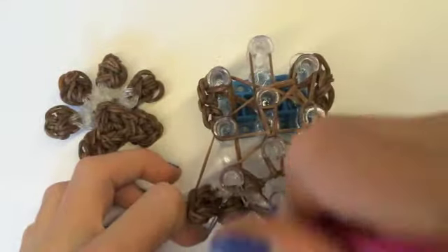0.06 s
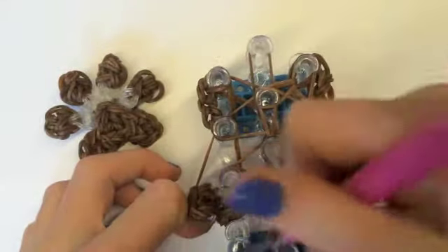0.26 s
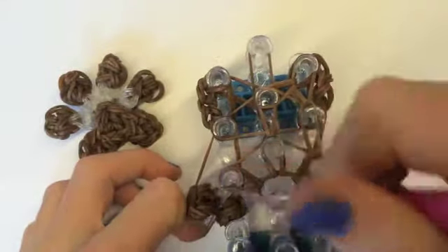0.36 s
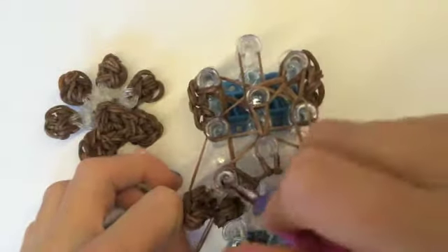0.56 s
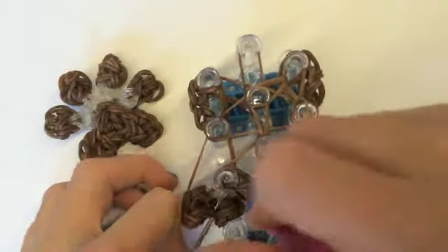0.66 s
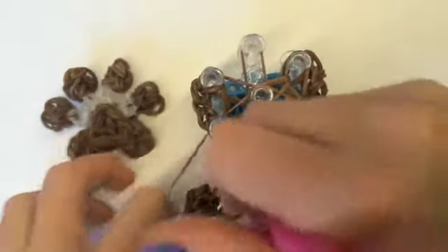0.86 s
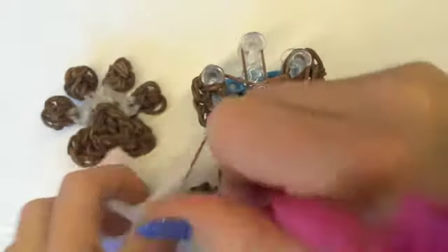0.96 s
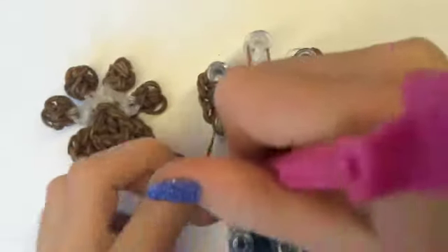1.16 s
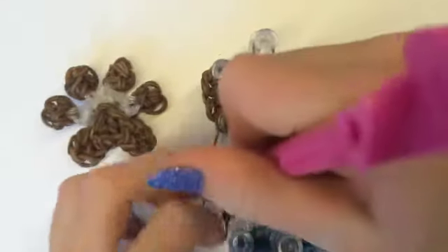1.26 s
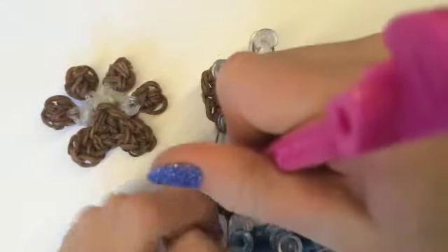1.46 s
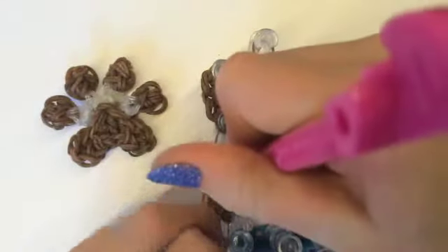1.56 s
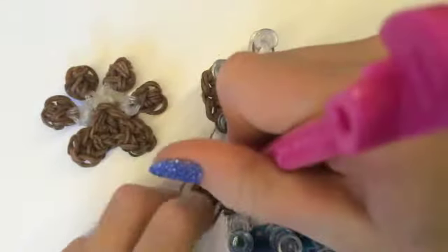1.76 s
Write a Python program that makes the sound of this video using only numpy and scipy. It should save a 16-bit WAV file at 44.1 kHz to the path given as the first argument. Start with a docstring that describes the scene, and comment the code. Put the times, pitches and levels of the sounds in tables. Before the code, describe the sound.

A plastic hook clicks against loom pegs, close up in a small room. After a faint rub, a loud bright double snap rings at 0.23 s, with a weaker crack at 0.28. Softer clicks and knocks come near 0.55, then light taps and rubs from 0.8 to 1.0. A band squeaks faintly with a dull knock at 1.24; small ticks and low bumps cluster around 1.65-1.8. Low noise and faint wavering hum continue.

```python
"""A plastic crochet hook works rubber bands over the pegs of a small plastic loom on a table.
Early on the hook snaps off a peg with bright cracks and rings, and the loom knocks on the table.
Light ticks, softer knocks, low bumps and hissing rubs of fingers and bands follow, made from noise and tones.
Past the middle one band drags with a short squeak of unsteady tones, then the handling goes on.
Throughout there is the short echo of a small room, with low noise and a faint wavering hum."""
import sys
import numpy as np
from scipy import signal
from scipy.fft import rfft, irfft, next_fast_len
from scipy.io import wavfile

SR = 44100
rng = np.random.default_rng(int(sys.argv[2]) if len(sys.argv) > 2 else 0)


def bounce(signal):
    """Save signal as a 16-bit WAV file at the path given by the first command-line argument."""
    frames = np.transpose(np.atleast_2d(signal))
    limited = np.clip(frames, -1, 1)
    pcm = np.round(limited * 32767).astype(np.int16)
    wavfile.write(sys.argv[1], SR, pcm)


N = 81585  # length in samples

TILT_PIVOT_HZ = 3920  # a treble tilt leaves this pitch unchanged


def amp(db):
    """Turns decibels into a gain."""
    return 10 ** (np.asarray(db) / 20)


def evened(x):
    """Scales a sound to an average (rms) strength of 1."""
    return x / np.sqrt(np.mean(x ** 2) + 1e-20)


def read(points, hz):
    """Reads values between the points of a table, along a log-frequency axis."""
    point_hz, value = np.transpose(points)
    return np.interp(np.log(hz + 1), np.log(point_hz + 1), value)


def add(mix, start_s, sound):
    """Mixes a sound in at a given time, cutting off what runs past the end."""
    part = mix[max(round(start_s * SR), 0):][:len(sound)]
    part += sound[:len(part)]


def octaves(hz, centre_hz):
    """Gives the distance in octaves from a centre; the added 20 Hz keeps the log finite."""
    return np.log2((hz + 20) / centre_hz)


def colour(x, curve):
    """Filters a sound by curve(Hz) in dB, with no response ahead of the sound itself."""
    size = next_fast_len(2 * len(x))
    hz = abs(np.fft.fftfreq(size, 1 / SR))
    log_gain = np.log(amp(curve(hz)))
    # The Hilbert transform finds the phase that makes the filter respond as early as it can
    response = np.exp(np.conj(signal.hilbert(log_gain)))
    return np.fft.ifft(np.fft.fft(x, size) * response).real[:len(x)]


def noise(spectrum, size):
    """Makes noise of rms 1 whose strength at each pitch follows a table."""
    gain = amp(read(spectrum, np.fft.rfftfreq(size, 1 / SR)))
    return evened(irfft(rfft(rng.standard_normal(size)) * gain, size))


def ring(modes, t):
    """A struck body rings as a sum of fading tones; each drops 60 dB in its own t60."""
    total = np.zeros(len(t))
    for hz, db, t60 in modes:
        fade = np.exp(-np.log(1000) * t / t60)
        total += amp(db) * fade * np.sin(2 * np.pi * hz * t)
    return total


def snap(db, tilt_db, first_hz, first_db, second_hz, second_db):
    """The hook springs free and strikes a peg, which rings fully."""
    return click(db, tilt_db, [(first_hz, first_db), (second_hz, second_db)], ring_db=0, decay_s=0.0024)


def tick(db, tilt_db, favoured_hz, lift_db):
    """A light, brief touch, its ring muted by fingers and bands."""
    return click(db, tilt_db, [(favoured_hz, lift_db)], ring_db=-2.5, decay_s=0.002)


def click(db, tilt_db, lifts, ring_db, decay_s):
    """Plastic meets plastic: a crack and a short ring, coloured by the place of contact."""
    # Ring of hook and pegs: pitch_hz, level_db, t60_s
    peg_modes = [(1113, -27.5, 0.031), (1427, -35.5, .06), (1650, -30.5, 0.024), (2491, -28.5, 0.028),
                 (2601, -17, 0.019), (3165, -23, 0.022), (3540, -28, .04), (4740, -30.5, .028),
                 (5590, -24, 0.016), (5880, -23, 0.014), (8510, -26.5, 0.006), (9525, -25.5, 0.015),
                 (11790, -29, 0.024), (12580, -24.5, 0.0075), (15400, -27, 0.006)]
    # Dense crack of the contact: pitch_hz, level_db (per Hz)
    crack_spectrum = [(60, -16), (300, -8.5), (700, -9.5), (1200, -2), (1900, -2.5), (3000, -1.5),
                      (4200, -4), (5500, -1), (7400, -1), (9500, -1.5), (13500, -1.5), (15000, -0.5)]
    crack_db, contact_s, lift_octaves = -8.5, 0.0004, 0.29
    t = np.arange(SR // 16) / SR

    def contact(hz):
        """Tilts the treble and lifts (or dips, if negative) the pitches near each centre."""
        total = tilt_db * octaves(hz, TILT_PIVOT_HZ)
        for centre_hz, lift_db in lifts:
            total = total + lift_db * np.exp(-(octaves(hz, centre_hz) / lift_octaves) ** 2)
        return total

    crack = amp(crack_db) * noise(crack_spectrum, len(t)) * np.exp(-t / decay_s)
    body = amp(ring_db) * ring(peg_modes, t)
    onset = np.minimum(t / contact_s, 1)
    return amp(db) * colour((crack + body) * onset, contact)


def knock(db, centre_hz, spread_octaves):
    """A soft blow thuds and rings those modes of loom and table that lie near its register."""
    # Ring of loom and table: pitch_hz, level_db, t60_s
    table_modes = [(111, -10.5, 0.18), (226, -8, .12), (268, -1.5, 0.15), (296.7, -5.5, .13),
                   (377.5, -5.5, 0.12), (490, -2, 0.095), (570, -7.5, 0.091), (806, -13.5, .05),
                   (1000, -9, 0.054), (1193, -11.5, .025), (1391, -7.5, 0.026)]
    thud_spectrum = [(150, -1), (1400, -0.5), (2000, -9.5), (15000, -26)]  # pitch_hz, level_db
    thud_decay_s, ring_rise_s, skirt_db = 0.003, 0.0023, 11
    t = np.arange(SR // 4) / SR

    def reach(hz):
        """Weakens pitches the farther they lie from the centre of the blow."""
        return skirt_db * (1 - np.sqrt(1 + (octaves(hz, centre_hz) / spread_octaves) ** 2))

    thud = colour(noise(thud_spectrum, len(t)) * np.exp(-t / thud_decay_s), reach)
    reached_modes = [(hz, level_db + reach(hz), t60) for hz, level_db, t60 in table_modes]
    body = ring(reached_modes, t) * np.minimum(t / ring_rise_s, 1)
    return amp(db) * (thud + body)


def bump(db, hz, rise_s, decay_s):
    """A hand nudges the table: one low, soft swell of tone."""
    t = np.arange(SR // 2) / SR
    swell = np.minimum(t / rise_s, 1) * np.exp(-np.maximum(t - rise_s, 0) / decay_s)
    return amp(db) * swell * np.sin(2 * np.pi * hz * t)


def rub(peak_s, rise_s, fall_s, db, tilt_db):
    """Skin or a band slides on plastic: fine friction grains and hiss that swell and fade."""
    # Colour of the rubbing: pitch_hz, level_db (per Hz)
    rub_spectrum = [(100, -7.5), (400, 6.5), (650, -3), (1000, 4), (1900, -0.5), (2800, 5), (4300, -2.5),
                    (5800, 4.5), (7000, -1.5), (8500, 1.5), (11000, -4), (15000, -0.5)]
    grains_per_s, grain_share = 4700, 0.5
    t = np.arange(N) / SR - peak_s
    grains = evened(rng.standard_normal(N) * (rng.random(N) < grains_per_s / SR))
    friction = grain_share * grains + (1 - grain_share) * rng.standard_normal(N)
    hz = np.fft.rfftfreq(N, 1 / SR)
    gain = amp(read(rub_spectrum, hz) + tilt_db * octaves(hz, TILT_PIVOT_HZ))
    hiss = evened(irfft(rfft(friction) * gain, N))
    swell = np.exp(-(t / np.where(t < 0, rise_s, fall_s)) ** 2)
    return amp(db) * hiss * swell


def squeak():
    """A rubber band drags in a few slips; its unsteady tones sag as it lets go."""
    # Slips of the dragged band: peak_s, length_s (spread of the bell-shaped swell), level_db
    slips = [(1.224, 0.0078, -54.5), (1.2402, 0.0045, -54), (1.242, 0.0033, -45.5), (1.267, 0.0067, -54.5)]
    # Tones of the squeak: pitch_hz (before sag and wander), level_db
    tones = [(900, -1), (1030, -6.5), (1670, -1), (2450, -10.5)]
    wander_share, wander_hz, sag_per_s = 0.047, 221, 0.92  # rms share of the pitch, low-pass edge, sag rate
    t = np.arange(N) / SR
    force = sum(amp(db) * np.exp(-((t - peak_s) / length_s) ** 2 / 2) for peak_s, length_s, db in slips)
    # The pitch slides down through its table value at the second slip
    sag = np.exp(-sag_per_s * np.clip(t - slips[1][0], -0.1, 0.1))
    smoother = signal.butter(2, wander_hz, fs=SR, output="sos")
    out = np.zeros(N)
    for hz, db in tones:
        wander = evened(signal.sosfilt(smoother, rng.standard_normal(N)))
        pitch_hz = hz * sag * (1 + wander_share * wander)
        out += amp(db) * np.sin(2 * np.pi * np.cumsum(pitch_hz) / SR)
    return force * out


def room(x):
    """A small room answers with a diffuse tail of noise that fades at its own rate at each pitch."""
    # Echo of the room: pitch_hz, level_db, t60_s
    echo = np.array([(100, -9, 0.36), (295, -5.5, 0.49), (520, -8, 0.12), (1110, -5, 0.17),
                     (2734, -18, 0.13), (5970, -20, 0.3), (10000, -20, 0.17), (14820, -23, .11)])
    delay_s = 0.0054
    hz, t, cells = signal.stft(rng.standard_normal(SR // 2), SR, nperseg=256)
    rate = np.log(1000) / read(echo[:, [0, 2]], hz)[:, None]
    # The square root keeps the echo's energy independent of how long it lasts
    gain = amp(read(echo[:, [0, 1]], hz))[:, None] * np.sqrt(2 * rate / SR)
    tail = signal.istft(cells * gain * np.exp(-rate * t), SR, nperseg=256)[1]
    out = np.zeros(N)
    add(out, delay_s, signal.fftconvolve(x, tail))
    return out


def background():
    """Low room noise with faint hiss, and a hum whose strength wavers with slow noise."""
    # Colour of the room noise: pitch_hz, level_db (per Hz)
    floor_spectrum = [(21, -40), (35, -11), (134, -6.5), (169, -4.5), (334, -18.5), (541, -18), (833, -25),
                      (922, -24), (1830, -28.5), (2300, -29), (15000, -35.5)]
    floor_db, hum_hz, hum_db = -70, 136.3, -81.5  # hum_db is its level before the wavering
    drift = noise([(1, 0), (6, 0), (20, -40), (100, -100)], N)  # pitch_hz, level_db
    tone = np.sqrt(2) * np.sin(2 * np.pi * hum_hz * np.arange(N) / SR)
    hum = tone * (1 + drift)
    return amp(floor_db) * noise(floor_spectrum, N) + amp(hum_db) * hum


def scene():
    """Puts all the handling sounds in the room, over its background."""
    # Hook snapping against pegs: start_s, level_db, tilt_db (per octave),
    # first_pitch_hz, first_lift_db, second_pitch_hz, second_lift_db
    snaps = [(0.2279, -4, .5, 5856, 8, 2870, 4.5), (0.2335, -3, -1.14, 10020, 3.5, 6660, -6.5),
             (0.2489, -26.5, 3.5, 6000, 7, 3000, -3.5), (0.2802, -15.5, -2.2, 4750, 7.5, 9100, 8.5),
             (0.2856, -32, -7.5, 4900, 18.5, 2627, -1)]
    # Light ticks of hook and bands: start_s, level_db, tilt_db (per octave), favoured_pitch_hz, lift_db
    ticks = [(0.204, -53, 1, 5610, 6), (0.353, -46, -7, 1250, 9), (0.5495, -37, -5, 3300, 11.5),
             (0.5697, -33.5, -3.5, 7000, 4), (0.7899, -46, 1.5, 12980, 7.5), (0.8802, -48, 4, 8700, 10.5),
             (0.9557, -45, 1.5, 2000, 15), (0.9601, -46.5, 3, 13000, -10), (1.003, -55, 12, 12860, -3),
             (1.0225, -55.5, 9.5, 13000, -2), (1.1353, -58.5, 3, 9000, 0), (1.1723, -47, 1.5, 6000, 3),
             (1.3156, -52, -6, 2870, 11.5), (1.4737, -55.5, -1, 2963, 6.5), (1.5101, -56, 3, 2604, 14),
             (1.5552, -53, -4.5, 1301, 2), (1.652, -54.5, -1, 2645, 17.5), (1.67, -46.5, -2.5, 3300, 4),
             (1.7431, -49, -6, 1810, 14.5), (1.7596, -43.5, 0.5, 1750, 6), (1.778, -47, -1.5, 2600, 7)]
    # Loom knocking on the table: start_s, level_db, centre_hz, spread_octaves
    knocks = [(0.2337, -33, 374, 1.46), (0.2806, -45.5, 300, 0.94), (0.5498, -43.5, 237, 0.7),
              (0.551, -52, 937, 0.32), (0.5701, -31, 338, 0.57), (0.5978, -40.5, 248.3, 0.54),
              (0.7905, -44, 523, 0.67), (0.8106, -39.5, 1210, 0.55), (0.812, -44.5, 515, .4),
              (0.826, -47.5, 460, 0.64), (0.956, -55, 507, 1.8), (0.976, -52.5, 345, 1.23),
              (1.243, -37, 203.6, 0.17), (1.745, -53, 109, 1.07), (1.785, -57.5, 810, 0.56)]
    # Dull bumps of the hands: start_s, level_db, pitch_hz, rise_s, decay_s
    bumps = [(0.238, -54, 75.5, .004, .013), (0.335, -61, 62, 0.0046, 0.005), (0.581, -55, 59, 0.012, 0.02),
             (0.843, -54.5, 100, 0.0046, 0.026), (0.975, -58.5, 102, 0.0054, .015),
             (1.135, -55.5, 115.3, 0.0066, 0.015), (1.305, -59.5, 141, 0.01, 0.015),
             (1.479, -59, 132, 0.011, 0.029), (1.544, -59.5, 129.5, 0.0078, 0.037),
             (1.663, -51, 148.8, 0.015, 0.032), (1.70, -48, 154.7, 0.0036, 0.022),
             (1.818, -48.5, 135, .012, 0.046)]
    # Skin and bands sliding on plastic: peak_s, rise_s, fall_s, level_db, tilt_db (per octave)
    rubs = [(0.0, .02, 0.047, -62.5, -7), (0.221, .018, .006, -66.5, -2.5), (0.31, .03, 0.07, -63, -3.5),
            (0.56, 0.0064, 0.014, -56, -3), (0.609, 0.053, 0.023, -59.5, -1.5),
            (0.681, .02, 0.017, -70, -2), (0.821, 0.044, 0.075, -62, 0.6), (0.89, 0.017, 0.053, -69.5, -3),
            (0.973, 0.011, 0.014, -66, -2.5), (1.012, 0.021, 0.018, -59.5, -2),
            (1.228, 0.045, 0.044, -58, -.5), (1.765, 0.046, .03, -72, -4.5)]
    dry = squeak() + sum(rub(*row) for row in rubs)
    for source, events in ((snap, snaps), (tick, ticks), (knock, knocks), (bump, bumps)):
        for start_s, *settings in events:
            add(dry, start_s, source(*settings))
    return (dry + room(dry) + background())[None]


def record(dry):
    """The microphone cuts the lowest bass and the recorder limits the treble."""
    low_cut_hz, edge_hz = 30, 15300
    low_cut = signal.butter(2, low_cut_hz, "highpass", fs=SR, output="sos")
    thinned = signal.sosfilt(low_cut, dry)
    band_limit = signal.firwin(255, edge_hz, window=("kaiser", 8), fs=SR)
    return signal.oaconvolve(thinned, band_limit[None], "same")


dry = scene()
out = record(dry)
bounce(out)
```